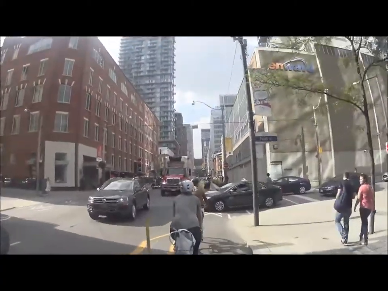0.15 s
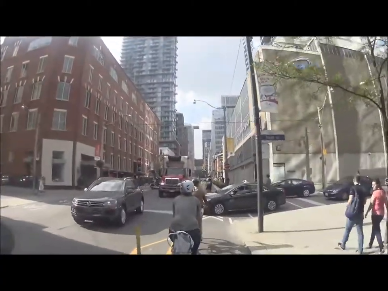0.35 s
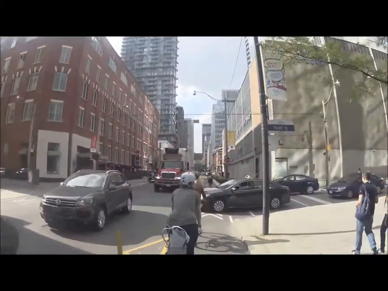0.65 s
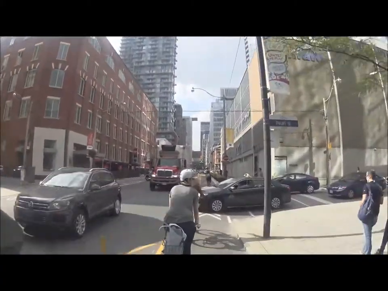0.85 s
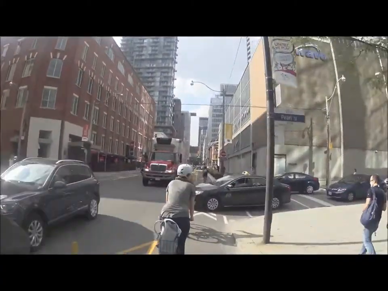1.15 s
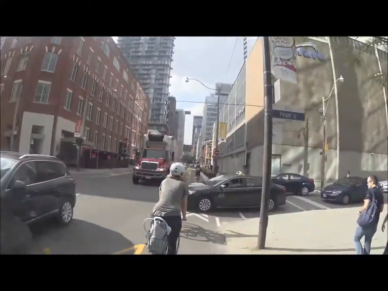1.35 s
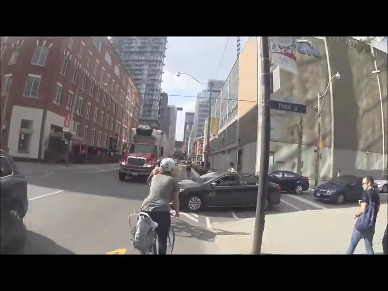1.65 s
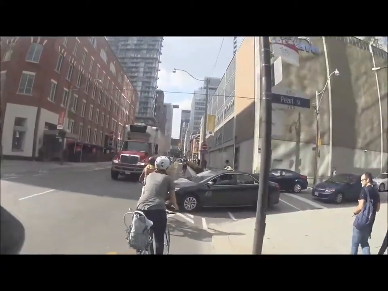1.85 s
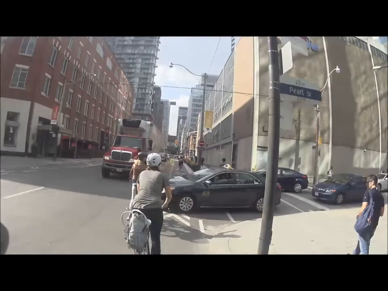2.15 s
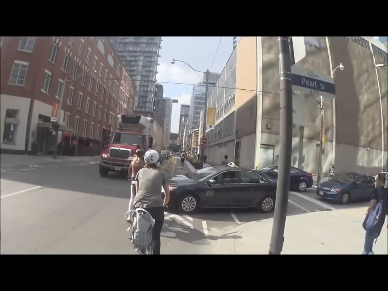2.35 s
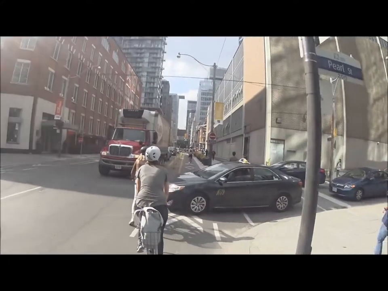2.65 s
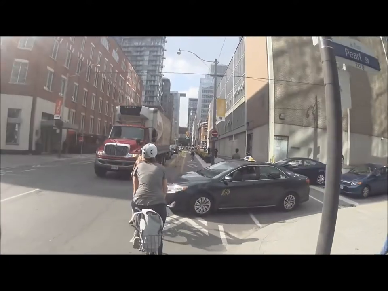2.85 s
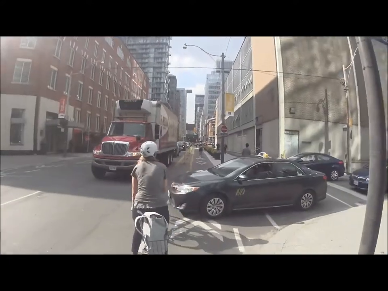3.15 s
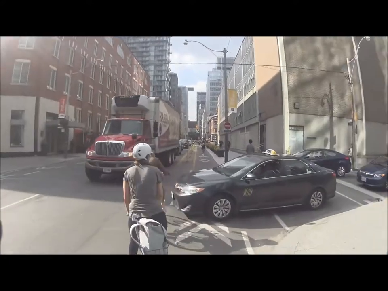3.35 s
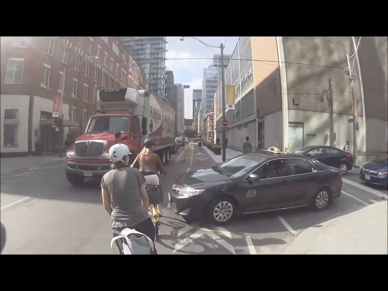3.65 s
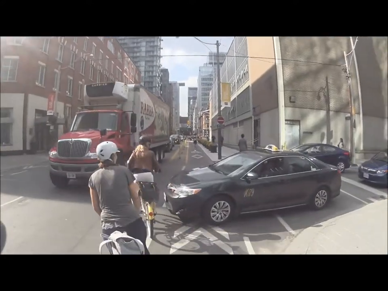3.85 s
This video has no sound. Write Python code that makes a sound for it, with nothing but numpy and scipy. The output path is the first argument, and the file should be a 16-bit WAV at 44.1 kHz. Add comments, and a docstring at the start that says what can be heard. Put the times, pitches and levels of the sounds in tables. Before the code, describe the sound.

One high air horn blast cuts off, and a truck's roar builds in city traffic.

```python
"""A small air horn on a moving bicycle is already sounding, sags slightly in pitch and is cut off.
Its diaphragm gives a harmonic tone over the hiss of escaping air. The house fronts throw the tone back,
a little sharp because the rider is closing in on them. Then the rush of the street swells as a truck
comes nearer, with the rising hum of an accelerating motor."""
import sys
import numpy as np
from scipy import signal
from scipy.fft import rfft, irfft, next_fast_len
from scipy.io import wavfile

SR = 44100
rng = np.random.default_rng(int(sys.argv[2]) if len(sys.argv) > 2 else 0)


def bounce(signal):
    """Save signal as a 16-bit WAV file at the path given by the first command-line argument."""
    frames = np.transpose(np.atleast_2d(signal))
    limited = np.clip(frames, -1, 1)
    pcm = np.round(limited * 32767).astype(np.int16)
    wavfile.write(sys.argv[1], SR, pcm)


N = 176400
TIME = np.arange(N) / SR
HORN_ON_S, HORN_OFF_S = -.25, .871
CUTOFF_HZ = 11080

# street balance, positive = left: freq_hz, pan_db
STREET_BALANCE = [(60, -1.5), (97, -2.0), (160, -2.5), (250, -2.5), (410, -2.0), (650, -1.0), (1050, 2.5),
                  (1700, 3), (2730, 6.44), (4410, 3.94), (7100, 2.46), (11400, 2.95)]


def from_db(db):
    return 10 ** (np.asarray(db) / 20)


def rms_one(x):
    return x / np.sqrt(np.mean(x ** 2) + 1e-20)


def in_time(rows):
    """Columns of a curve at every sample."""
    time_s, *columns = np.transpose(rows)
    return [np.interp(TIME, time_s, column) for column in columns]


def at_hz(points, hz):
    """Curve read on a log-frequency axis."""
    freq_hz, values = np.transpose(points)
    return np.interp(np.log(hz + 1e-6), np.log(freq_hz), values)


def pan(db):
    """Left and right gains, mean 1."""
    ratio = np.atleast_1d(from_db(db))
    return 2 * np.array([ratio, np.ones_like(ratio)]) / (1 + ratio)


def drift(rate_hz, size=N):
    """Smooth random motion, rms about 1."""
    pole = np.exp(-80 * np.pi * rate_hz / SR)
    slow = signal.lfilter([1], [1, -2 * pole, pole * pole], rng.standard_normal(size // 40 + 2002))[2000:]
    return np.interp(np.arange(size) / 40, np.arange(len(slow)), rms_one(slow))


def street_noise(spectrum, flicker_db, bass_hz=10, bands=8):
    """Coloured stereo noise, rms 1; bands flicker partly together."""
    # left-right likeness: freq_hz, correlation
    likeness = [(50, 0.73), (200, 1), (700, 0.8), (1400, 0.94), (2500, 0.58), (4500, 0.96), (10000, 0.58)]
    # narrow peaks and notches: centre_hz, half_width_hz, gain_db
    ripple = [(1110, 17, -2.5), (1130, 110, -1.5), (1720, 64, 4.5), (1856, 70, -1), (3050, 140, 2.5),
              (4510, 110, 2.5), (6950, 110, -6), (9100, 160, -7.5), (9850, 200, -0.5)]
    hz = np.fft.rfftfreq(N, 1 / SR)
    mid, side = rfft(rng.standard_normal((2, N)))
    alike = np.clip(at_hz(likeness, hz), 0, 1)
    stereo = np.sqrt(1 + alike) * mid + np.sqrt(1 - alike) * side * [[1], [-1]]
    ripple_db = sum(db / (1 + ((hz - centre) / width) ** 2) for centre, width, db in ripple)
    passband = hz ** 2 / (hz ** 2 + bass_hz ** 2) * (hz < CUTOFF_HZ)
    stereo *= from_db(at_hz(spectrum, hz) + ripple_db) * passband * pan(at_hz(STREET_BALANCE, hz))
    band = np.searchsorted(np.geomspace(250, 7000, bands - 1), hz)
    common = .6 * drift(34)
    gains = [from_db(flicker_db * (common + drift(25))) for _ in range(bands)]
    return rms_one(sum(irfft(stereo * (band == k), N) * gain for k, gain in enumerate(gains)))


def city():
    """Far city noise, slowly swelling."""
    # colour: freq_hz, relative_db
    spectrum = [(22, 2), (36, -5), (48, -5), (75, -9), (105, 2), (200, 3), (420, -2), (720, -7.5),
                (1050, 7), (1200, 2), (1350, 10), (1520, 3.5), (2200, 4), (3100, -2), (3700, -5.5),
                (4600, -5.5), (6500, -14), (9000, -20), (11000, -19)]
    # swell: time_s, level_db
    swell = [(0, -47), (.87, -48.5), (1.1, -44), (1.5, -43), (4, -31)]
    level_db, = in_time(swell)
    return from_db(level_db) * street_noise(spectrum, flicker_db=1.55)


def idling_cars(firing_hz=56, waver_hz=1.2, rough_db=1.8):
    """Low firing note of waiting cars."""
    # envelope: time_s, level_db
    envelope = [(0, -66), (.9, -74), (1.5, -62.5), (2.5, -66), (4, -57.5)]
    level_db, = in_time(envelope)
    phase = 2 * np.pi * np.cumsum(firing_hz + waver_hz * drift(5)) / SR
    hum = np.sqrt(2) * np.sin(phase) * from_db(level_db + rough_db * drift(5))
    return hum * pan(at_hz(STREET_BALANCE, firing_hz))


def air_puff(start_s=1.55, rise_s=.043, level_db=-52.5):
    """Brief, thin hiss of air far off in the traffic."""
    # colour: freq_hz, relative_db
    spectrum = [(3000, -23), (6000, 4), (8000, -5), (10000, 1), (11000, -6)]
    age = np.maximum(TIME - start_s, 0) / rise_s
    return from_db(level_db) * age * np.exp(1 - age) * street_noise(spectrum, flicker_db=.8, bands=2)


def near_traffic(housing_hz=1345, housing_width_hz=92, housing_relative_db=-5.5):
    """Swelling rush of near traffic, with a hollow ring from the microphone housing."""
    # colour: freq_hz, relative_db
    spectrum = [(180, -16.5), (300, -6), (450, -7), (600, -8), (730, -27), (1060, -11.5), (1160, -22.5),
                (1350, -5.5), (1530, -8), (1720, -7), (1940, -9), (2190, -4), (2510, -8), (3100, -5.5),
                (3830, -9), (4590, -3), (6890, -18.5), (7780, -17), (9040, -22.5), (9900, -19),
                (11000, -31.5)]
    # swell: time_s, level_db
    swell = [(0, -56), (1.4, -46.5), (1.75, -46), (2.1, -43), (2.25, -38), (2.5, -36.5), (2.75, -32.5),
             (3.0, -30), (3.3, -28.5), (3.6, -27.5), (4, -24.5)]
    level_db, = in_time(swell)
    housing = signal.iirpeak(housing_hz, housing_hz / housing_width_hz, fs=SR)
    housing_ring = from_db(housing_relative_db) * rms_one(signal.lfilter(*housing, rng.standard_normal(N)))
    rush = street_noise(spectrum, flicker_db=1.0, bass_hz=110)
    return from_db(level_db) * (rush + housing_ring * pan(at_hz(STREET_BALANCE, housing_hz)))


def motor(waver_hz=1.0, rough_db=1.0, pan_db=-2.2):
    """Slightly rough hum and its octave, climbing with speed."""
    # acceleration: time_s, pitch_hz, fundamental_db, octave_db
    run_up = [(2.1, 152.7, -69.5, -80), (2.3, 160.5, -56.5, -66), (2.5, 170.4, -56, -46),
              (2.75, 181.1, -49.5, -46.5), (3.0, 192.7, -45, -52), (3.25, 200, -36.5, -50),
              (3.48, 208, -34.5, -47), (3.65, 211.7, -40, -51), (3.78, 214.6, -35, -49),
              (3.87, 215.5, -41.5, -44.5), (4, 217, -35.5, -40)]
    pitch_hz, *levels_db = in_time(run_up)
    phase = 2 * np.pi * np.cumsum(pitch_hz + waver_hz * drift(8.4)) / SR
    hum = sum(np.sin(k * phase) * from_db(db + rough_db * drift(6.8)) for k, db in enumerate(levels_db, 1))
    fade_in = np.clip(TIME - 1, 0, 1)
    return np.sqrt(2) * hum * pan(pan_db) * fade_in


def truck():
    """Roar of a truck coming close."""
    # colour: freq_hz, relative_db
    spectrum = [(30, -17), (70, -8), (105, -15.5), (200, 0.5), (300, -13), (450, -5.5), (750, -9.5),
                (1150, -15.5), (1340, 16), (1520, -2.5), (1720, 6.5), (1950, 1), (2200, 6), (3000, -6.5),
                (4500, -6.5), (6500, -14.5), (11000, -17)]
    # approach: time_s, level_db
    approach = [(0, -86.5), (2.8, -51.5), (3.3, -36.5), (3.6, -27), (3.9, -24), (4, -23.5)]
    level_db, = in_time(approach)
    return from_db(level_db) * street_noise(spectrum, flicker_db=1.7)


def facade_echoes(sent, count=48, first_s=.012, last_s=.75, body_t60_s=1.56, treble_t60_s=.7):
    """House fronts return the horn, Doppler-shifted by the rider's motion; far echoes are duller."""
    delays_s = first_s + (last_s - first_s) * (np.arange(count) + rng.random(count)) / count
    gains = from_db(-60 * delays_s[:, None] / [body_t60_s, treble_t60_s])
    gains /= np.linalg.norm(gains, axis=0)
    body = signal.sosfiltfilt(signal.butter(6, 5500, fs=SR, output="sos"), sent)
    oversampled = signal.resample_poly([body, sent - body], 4, 1, axis=1)
    oversampled_s = HORN_ON_S + np.arange(oversampled.shape[1]) / (4 * SR)
    t, echoes = TIME[:2 * SR], np.zeros((2, N))
    for delay_s, gain, (speed, side) in zip(delays_s, gains, rng.standard_normal((count, 2))):
        doppler = .009 + .007 * speed  # fraction of pitch
        emitted_s = t - delay_s + doppler * (t - HORN_OFF_S)
        echo = np.interp(emitted_s, oversampled_s, gain @ oversampled, 0, 0)
        echoes[:, :len(t)] += pan(db=3.5 + 5 * side) * echo
    return echoes


def valve(t, release_s):
    """Horn envelope: open while blown, exponential decay once shut."""
    return np.exp(-np.maximum(t - HORN_OFF_S, 0) / release_s) * np.clip((t - HORN_ON_S) * 100, 0, 1)


def horn_air(hiss_db=-40, whistle_hz=1140, drain_s=.022):
    """Hiss of the driving air and a faint stray whistle; the air drains just after the tone."""
    # hiss colour: freq_hz, relative_db
    spectrum = [(300, -20.5), (800, -8.5), (1350, -26), (1650, -4), (2100, 10), (2800, -2.5), (3700, 3.5),
                (4600, -2.5), (5800, -11), (9000, -27), (11000, -8.5)]
    # whistle envelope: time_s, level_db
    envelope = [(0, -64), (.4, -65), (.51, -52.5), (.6, -60), (.71, -49), (.85, -57)]
    whistle_db, = in_time(envelope)
    phase = 2 * np.pi * np.cumsum(whistle_hz + 6 * drift(30)) / SR
    whistle = np.sqrt(2) * from_db(whistle_db) * np.sin(phase) * pan(at_hz(STREET_BALANCE, whistle_hz))
    hiss = from_db(hiss_db) * street_noise(spectrum, flicker_db=.9)
    return valve(TIME, drain_s) * (hiss + whistle)


def horn(note_hz=1008.8, sag_hz_per_s=2.91, jitter_hz=.8):
    """The diaphragm's harmonic tone: stereo beside the horn, mono as sent down the street."""
    # harmonics from the fundamental up: level_db, push_db, pan_db, flutter_db, echo_db
    harmonics = [(-26, .5, 4, 0.35, -40.5), (-14, -.8, 5, -0.13, -37.5), (-18, -3, 4, 0.52, -38.5),
                 (-47.5, 15, 12, 5.5, -50), (-26, 4.5, 5, 1, -41.5), (-34, 0, 2, 2.5, -44),
                 (-46, 0, -7, 4, -54), (-40.5, 1, -1.3, 3, -49), (-50, 3.5, 14, 3, -59),
                 (-42.5, 1.5, 5, 2.5, -57)]
    overshoot_hz, settle_s = 5.4, .1  # first burst of pressure blows sharp
    push_end_s, push_fade_s = .19, .046  # harder tone at first
    bend_hz_per_s = 150  # pitch flicks up as pressure falls
    release_s, bore_ring_s = .0065, .015  # tube rings on, mostly at its lowest note
    dip_harmonic, dip_s, dip_width_s, dip_db = 5, .223, .014, -6.5
    t = np.arange(HORN_ON_S, 1, 1 / SR)
    pitch_hz = note_hz - sag_hz_per_s * t + jitter_hz * drift(90, len(t))
    pitch_hz += overshoot_hz * np.exp(-np.maximum(t, 0) / settle_s)
    pitch_hz += bend_hz_per_s * np.maximum(t - HORN_OFF_S, 0)
    phase = 2 * np.pi * np.cumsum(pitch_hz) / SR
    push = .5 - .5 * np.tanh((t - push_end_s) / push_fade_s)
    dip = np.exp(-((t - dip_s) / dip_width_s) ** 2)
    near, sent = 0, 0
    for k, (level_db, push_db, pan_db, flutter_db, echo_db) in enumerate(harmonics, 1):
        wave = np.sqrt(2) * np.sin(k * phase) * valve(t, release_s + bore_ring_s / k ** 3)
        flutter = drift(6.7, len(t)) + .5 * drift(27, len(t))
        near_db = level_db + push_db * push + flutter_db * flutter + (k == dip_harmonic) * dip_db * dip
        near += pan(pan_db) * wave * from_db(near_db)
        sent += wave * from_db(echo_db)
    near = near[:, t >= 0]
    return np.pad(near, ((0, 0), (0, N - near.shape[1]))), sent


def scene():
    """Horn, echoes and street."""
    near, sent = horn()
    blast = near + facade_echoes(sent) + horn_air()
    return blast + near_traffic() + city() + truck() + motor() + idling_cars() + air_puff()


def record(dry):
    """Two microphone ports differing in phase, then a steep low-pass."""
    # left port's phase lead: freq_hz, lead_rad
    port_lead = [(100, 0.17), (1200, -.15), (1800, 0.36), (2030, 0.89), (2350, -0.88), (3000, -0.19),
                 (4100, -0.21), (5300, -0.59), (6800, -.1), (11000, -.15)]
    size = next_fast_len(N + SR // 10)
    shift_rad = at_hz(port_lead, np.fft.rfftfreq(size, 1 / SR)) * [[.5], [-.5]]
    ports = irfft(rfft(dry, size) * np.exp(1j * shift_rad), size)[:, :N]
    return signal.sosfilt(signal.ellip(12, .1, 90, CUTOFF_HZ, fs=SR, output="sos"), ports)


dry = scene()
out = record(dry)
bounce(out)
```